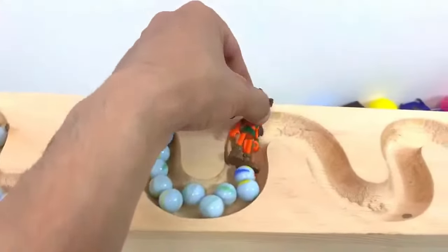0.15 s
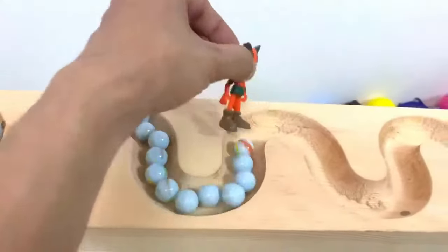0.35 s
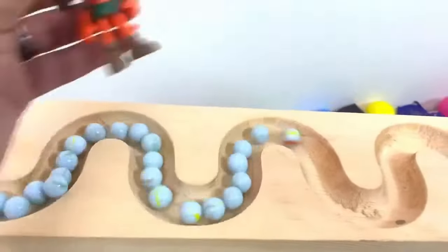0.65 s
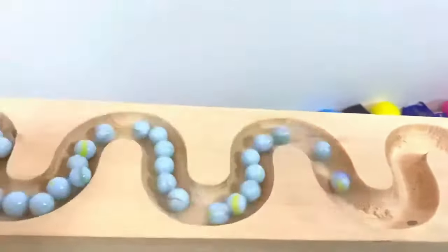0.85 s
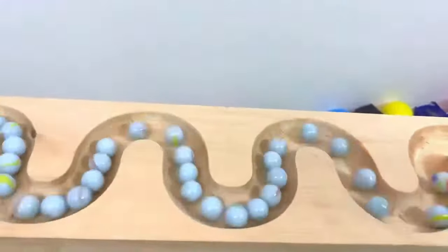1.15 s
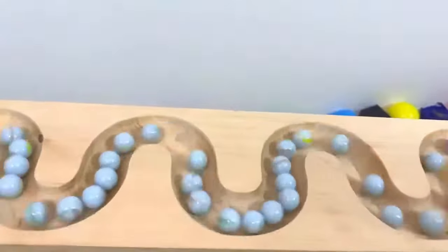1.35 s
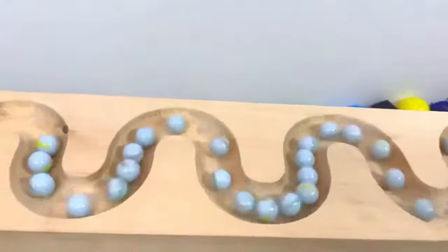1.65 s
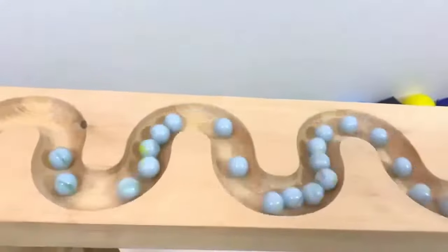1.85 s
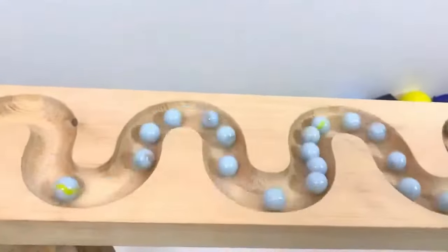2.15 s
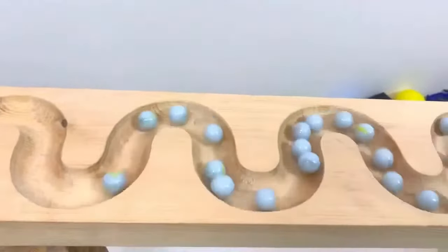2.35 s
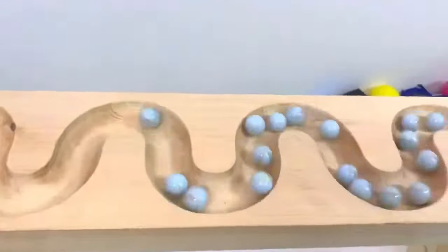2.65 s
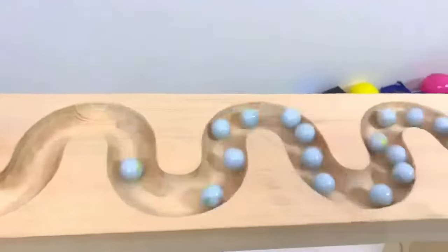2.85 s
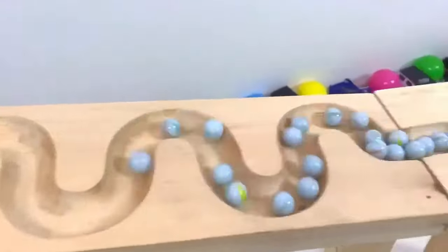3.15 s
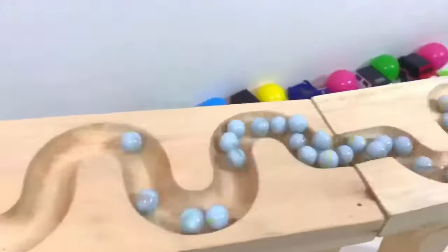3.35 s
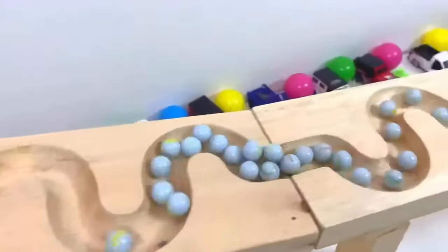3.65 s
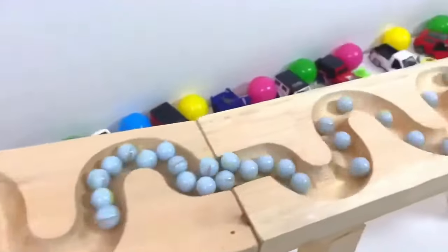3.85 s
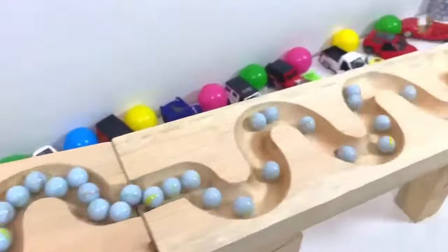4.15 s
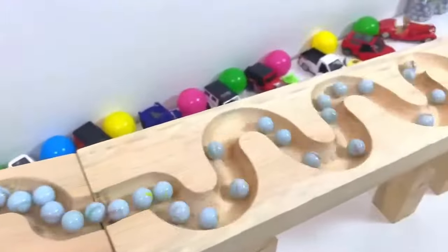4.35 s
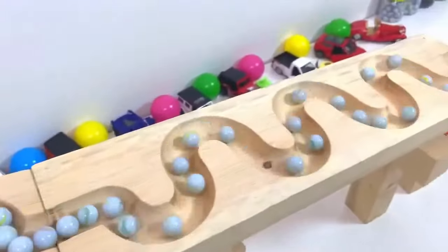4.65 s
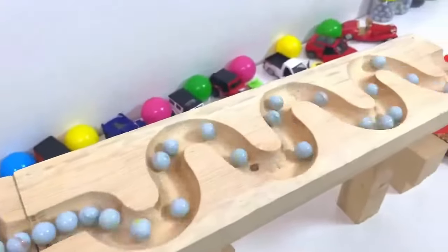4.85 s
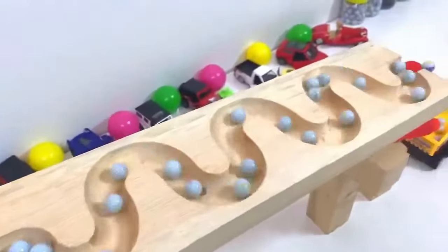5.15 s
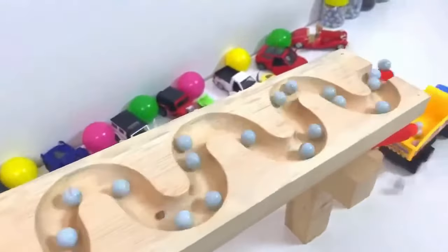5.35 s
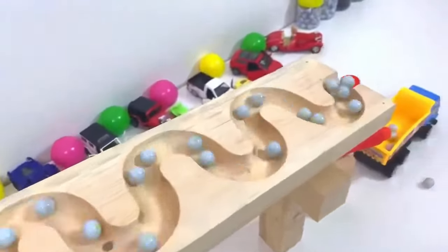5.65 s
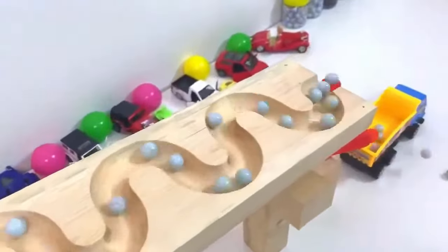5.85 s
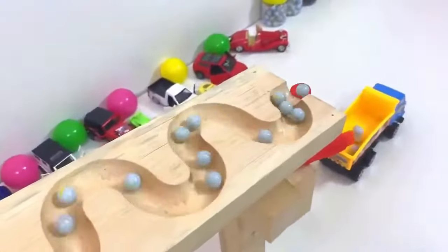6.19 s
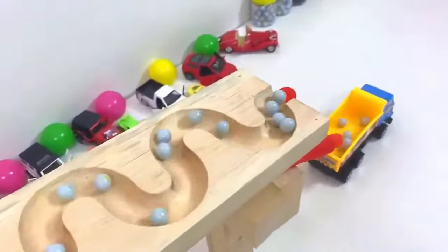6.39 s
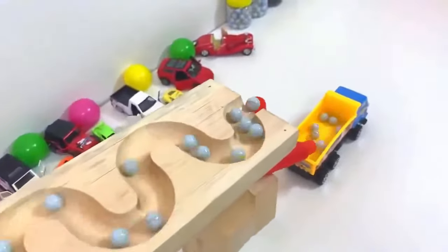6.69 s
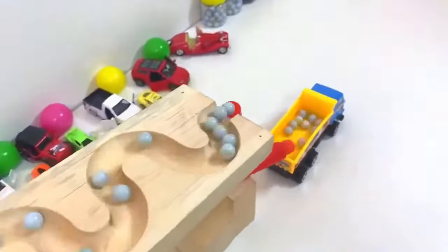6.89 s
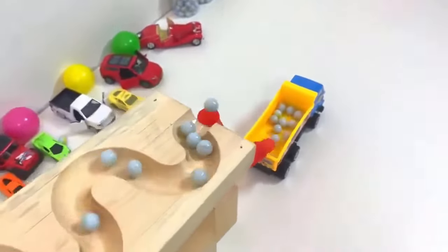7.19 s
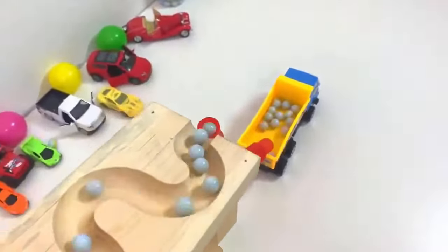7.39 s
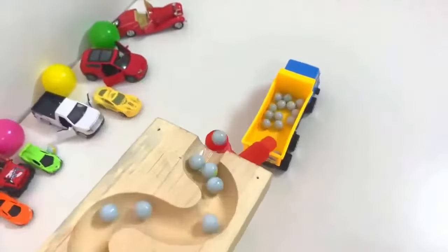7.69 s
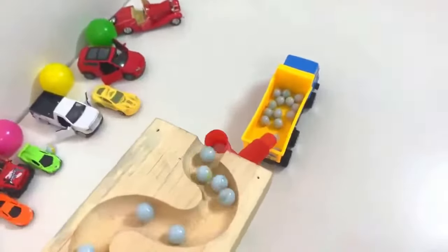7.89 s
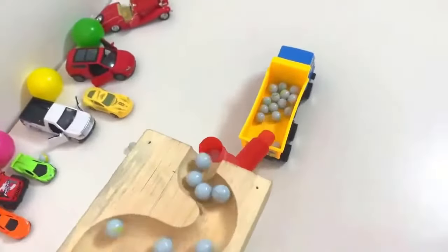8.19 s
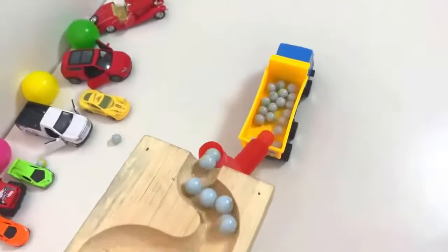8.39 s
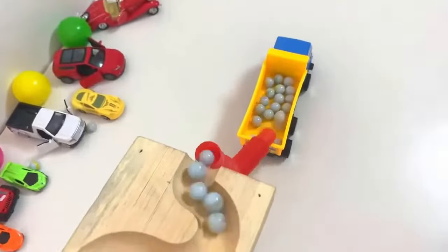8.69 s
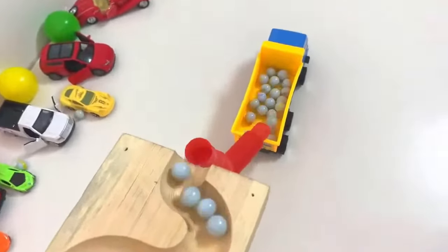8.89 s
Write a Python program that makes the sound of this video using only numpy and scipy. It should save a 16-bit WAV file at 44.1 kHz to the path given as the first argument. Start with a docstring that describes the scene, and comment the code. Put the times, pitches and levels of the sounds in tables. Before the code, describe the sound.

In a small hard room, a train of glass marbles gathers speed down a winding groove in wooden boards: low grainy rumble, short wooden ringing and bright glass clicks. After about five and a half seconds they drop one by one into a plastic toy truck bed, with much louder hollow clacks, small bounces and rattling. Close stereo microphone, seemingly following the track, with short lively reverberation.

```python
"""A rolling rumble with ringing wood and glassy clicks gives way to a plastic clatter, in a small hard room.
Glass marbles are let go down a winding groove in two wooden boards: random impacts excite the board modes.
Marbles click on each other and knock the groove walls: short pulses and dense rings through colour filters.
At the end they drop down a chute into the plastic bed of a toy truck: damped modes, clacks and rattling.
Echoes and diffuse reverberation surround them, over dull low bumps and a steady room tone."""
import sys
import numpy as np
from scipy import signal
from scipy.fft import rfft, irfft
from scipy.io import wavfile
from scipy.ndimage import uniform_filter1d, map_coordinates

SR = 44100
rng = np.random.default_rng(int(sys.argv[2]) if len(sys.argv) > 2 else 0)


def waveform_to_disk(signal):
    """Save audio, clipped to [-1, 1], as 16-bit WAV at the path in sys.argv[1]."""
    frames = np.transpose(np.atleast_2d(signal))
    scaled = np.clip(frames, -1, 1) * 32767
    samples = np.round(scaled).astype(np.int16)
    wavfile.write(sys.argv[1], SR, samples)


N = 398223
TIME = np.arange(N) / SR
JOINT_S = 3.1  # the leading marbles pass on to the lower board
TRACK_LAG_S, TRUCK_LAG_S = .0003, -0.0001786  # nominal delay of the left ear behind the right

# Table levels are relative: each layer adds its own gain. Colours list hz, db_per_hz.
# level of the rolling train, standing for its speed: time_s, level_db
ROLLING_PACE = [(0.9, -69), (1.31, -60), (2.33, -54), (3.67, -56), (4.2, -62), (5.4, -56)]
# marble against the groove wall: start_s, ring_1_db, ring_2_db, ring_3_db, ring_4_db
WALL_KNOCKS = [(1.117, -58, -54, -34.5, -62), (1.769, -42, -50, -44, -53), (1.811, -31.5, -27, -25.5, -47),
               (2.289, -38, -37.5, -54, -72.5), (2.384, -37, -40, -66, -80), (2.522, -38, -44, -31, -71),
               (2.582, -42, -48, -36.5, -68), (2.729, -38, -45, -40, -60), (3.246, -48, -48, -44, -38),
               (3.502, -46, -46, -43.5, -56), (3.779, -45, -39, -52, -68.5), (3.812, -48, -37.5, -50, -57),
               (3.832, -57, -41, -47, -43.5)]
# marble into the truck: start_s, bed_boom_db, wall_clack_db, contact_crack_db, pile_glass_db, boom_pitch_hz
TRUCK_DROPS = [(5.479, -13.5, -15, -16.5, -26, 693), (5.6713, -25.5, -19.5, -21.5, -33, 670),
               (5.7653, -10.5, -17, -15.5, -24.5, 702), (5.891, -39, -27.5, -34, -41, 693),
               (5.9545, -15.5, -21, -21.5, -31.5, 684), (6.012, -30, -24.5, -18.5, -32, 700),
               (6.042, -20, -28, -41, -55, 659), (6.1613, -32, -21.5, -22.5, -40, 697),
               (6.237, -26.5, -27.5, -35, -58, 625), (6.296, -35, -27.5, -39, -34, 610),
               (6.361, -29.5, -50, -57, -46, 630), (6.381, -35, -51, -57, -50, 600),
               (6.457, -24, -26.5, -30, -28, 633), (6.57, -28, -36, -43, -54, 642),
               (6.633, -34, -31, -37, -39, 630), (6.668, -32.5, -28.5, -34, -33.5, 656),
               (6.804, -25, -35.5, -35, -31.5, 617), (6.871, -25, -35, -33, -32, 643),
               (6.902, -28, -29, -33.5, -34, 674), (6.944, -33, -40, -56, -54, 670),
               (7.001, -44, -30, -34.5, -34, 720), (7.042, -26, -26, -31, -29, 726.5),
               (7.09, -35, -37, -57, -36.5, 736), (7.267, -23, -25, -31, -29.5, 684),
               (7.326, -33.5, -27, -33.5, -41, 660), (7.51, -22.5, -24.5, -34, -35, 695),
               (7.552, -36, -27.5, -31, -27, 675), (7.6073, -10, -17.5, -16, -26, 717),
               (7.651, -23.5, -25.5, -31, -34.5, 666), (7.7963, -14.5, -23.5, -23, -37.5, 725),
               (7.8855, -21.5, -32.5, -31.5, -51, 756), (7.931, -30, -34, -42, -38, 715),
               (7.9874, -22, -25, -26.5, -33, 684), (8.1224, -28, -21.5, -28.5, -29.5, 607),
               (8.247, -36, -23.5, -40.5, -38, 710), (8.383, -21.5, -22, -27, -27.5, 720),
               (8.501, -27.5, -25, -29.5, -31.5, 705), (8.531, -24, -19.5, -29.5, -29, 678),
               (8.603, -31.5, -39, -53, -53, 704), (8.653, -36.5, -34.5, -45, -51, 696),
               (8.7356, -19.5, -24, -28, -29.5, 830), (8.803, -33.5, -37, -43, -53, 774),
               (9.004, -26.5, -25.5, -28.5, -27.5, 855)]
# wood scuffed by a marble pressed against the wall of a bend: hz, db_per_hz
GRIT_COLOUR = [(750, 0), (1500, 1.5), (2900, -6), (4000, -21.5)]
# plastic walls of the truck bed: hz, db_per_hz
CLACK_COLOUR = [(600, -33), (900, -5), (1170, 3), (1600, 0.5), (2000, -2), (2500, -13.5), (3600, -46)]
# contact of marble and truck: hz, db_per_hz
CRACK_COLOUR = [(1700, -8.5), (2500, 0.5), (3400, -1), (4400, 1), (5200, -6), (6200, -5.5), (7200, -18.5),
                (10000, -25)]
# glass striking the pile of marbles: hz, db_per_hz
PILE_COLOUR = [(4000, -22.5), (7000, -1.5), (10500, -1), (12000, -6), (13500, -3.5), (15500, -39)]


def rolling():
    """Rough contact as a random force: marbles rumble over the grain, ring the board modes and scuff the wood."""
    # broad rumble: hz, db_per_hz
    rumble_colour = [(60, -26.5), (130, -3), (200, -1.5), (330, -1.5), (700, -1.5), (1400, -8.5),
                     (3000, -24.5), (6000, -29), (15000, -69)]
    # ring at the usual pace, one row for each of the first three rings: upper_board_db, lower_board_db
    steady_ring = [(-55.5, -50), (-79, -63), (-80, -87)]
    # a marble grinds round the outer wall of a bend: middle_s, length_s, ring_1_db, ring_2_db, ring_3_db
    bend_grinds = [(1.17, 0.15, -53, -60, -47.5), (1.46, 0.061, -46.5, -68, -62),
                   (1.55, 0.06, -60, -74, -53), (1.655, 0.058, -46.5, -62, -44.5),
                   (1.73, 0.095, -54, -56, -48.5), (1.839, 0.17, -36, -35.5, -55),
                   (2.087, 0.051, -39, -53, -38.5), (2.144, 0.067, -36, -50, -39),
                   (2.22, 0.1, -45, -57, -56), (2.33, 0.26, -44, -41, -65), (2.48, 0.18, -40, -47, -49),
                   (2.636, 0.061, -39.5, -56, -38), (2.724, 0.085, -36.5, -54, -44),
                   (2.833, 0.12, -45, -60, -41.5), (3.008, 0.095, -40.5, -48, -56),
                   (3.26, 0.15, -47, -52, -53), (3.37, 0.076, -38.5, -53, -67),
                   (3.929, 0.037, -41.5, -67, -69), (4.106, 0.066, -40.5, -44, -73),
                   (4.18, 0.0685, -39, -49, -62), (4.276, 0.048, -42, -58.5, -73.5),
                   (4.369, 0.091, -41, -53, -82), (4.56, 0.081, -41.5, -51.5, -83),
                   (4.791, 0.19, -46.5, -53, -71), (4.99, 0.089, -46, -52, -78),
                   (5.068, 0.052, -36, -58, -56.5), (5.123, 0.047, -34.5, -68, -67),
                   (5.36, 0.033, -41.5, -59.5, -68)]
    # the second ring sinks as the marbles run on down the lower board: time_s, pitch_factor
    ring_glide = [(3.85, 0.9), (4.12, 0.91), (4.36, .84)]
    # ever new points of contact shift the pitch, rms share of frequency: ring_1, ring_2, ring_3
    ring_wander = (0.0048, 0.01017, 0.0032)
    # damping by the rolling marbles, factor on the mode width: ring_1, ring_2, ring_3
    ring_damping = (1, 1, 0.86)
    rumble_db, ring_gains_db, grit_db = 3.5, (-1.5, -2.5, -1), -6.0
    release_s = 0.5
    ring_growth, usual_pace_db = 2.1, -56  # dB of ring per dB of rumble, around this pace
    skid_db, skid_fall_db_per_s = -10, 221  # after a knock the marble skids on along the wall

    grain = amp(2.0 * unit(uniform_filter1d(rng.standard_normal(N), size=900)))
    pace = amp(np.interp(TIME, *np.transpose(ROLLING_PACE)))
    out = amp(rumble_db) * pace * grain * noise(rumble_colour, 0.61)

    drive = (pace / amp(usual_pace_db)) ** ring_growth
    on_lower = np.clip((TIME - JOINT_S) / 0.25 + .5, 0, 1)
    flutter = lumps(depth_db=4.5, length_s=0.0099)  # the marble chatters against the wall
    pressure = 0
    for k, (ring_db, (upper_db, lower_db)) in enumerate(zip(ring_gains_db, steady_ring)):
        steady = drive * amp(upper_db + (lower_db - upper_db) * on_lower)
        grinding = swells([(s, length, rings_db[k]) for s, length, *rings_db in bend_grinds])
        skids = [(s, rings_db[k] + skid_db) for s, *rings_db in WALL_KNOCKS]
        skidding = dying(skids, skid_fall_db_per_s)
        gain = amp(ring_db) * np.sqrt(steady ** 2 + grinding ** 2 + skidding ** 2)
        if k > 0:  # the scuffing follows the higher rings, woken by marbles pressed hard to the wall
            pressure = np.hypot(pressure, gain)
        bumps = impacts(per_s=500, spread_db=3.2)
        upper, lower = (
            unit(convolve(bumps, board_ring(k, side, ring_damping[k], rise_s=0.0033)))
            for side in (False, True))
        ring = sustained(np.sqrt(1 - on_lower) * upper + np.sqrt(on_lower) * lower)
        glide = np.interp(TIME, *np.transpose(ring_glide)) if k == 1 else 1
        out += gain * flutter * wandering(ring, ring_wander[k], glide)

    def scuff():
        return snap(causal(GRIT_COLOUR, uneven_db=5.5), 3.1, 0.025, TRACK_LAG_S)

    out += amp(grit_db) * pressure * patter(scuff, per_s=240, spread_db=6.0)
    return out * np.clip((TIME - release_s) / .5, 0, 1)  # the train gathers speed


def bending():
    """Flexural resonance: the weight of the rolling train excites the lowest bending mode of each board."""
    # slow bending mode: upper_board_hz, lower_board_hz, width_hz
    upper_hz, lower_hz, width_hz = (267, 337, 18)
    bend_db = -8.0
    t = np.arange(4096) / SR
    bumps = ears([impacts(per_s=400, spread_db=3.4) for _ in range(2)], 0.33, 0)
    decay = np.exp(-np.pi * width_hz * t)
    upper, lower = (
        unit(convolve(bumps, decay * np.sin(2 * np.pi * hz * t))) for hz in (upper_hz, lower_hz))
    on_lower = np.clip(TIME - JOINT_S, 0, 1)
    return amp(bend_db) * level(ROLLING_PACE) * (np.sqrt(1 - on_lower) * upper + np.sqrt(on_lower) * lower)


def knocks():
    """Impulsive excitation: a marble meets a bend, rings the board damped by the touch and scuffs the wood."""
    damping, scuff_db = 2.5, -9  # factor on mode width; level against the third ring
    out = np.zeros((2, N))
    for s, *rings_db in WALL_KNOCKS:
        rings = sum(amp(db) * board_ring(k, s > JOINT_S, damping, rise_s=0.0022)
                    for k, db in enumerate(rings_db))
        add(out, s, rings)
        scuff = snap(causal(GRIT_COLOUR, uneven_db=9), 11, 0.051, TRACK_LAG_S, rise_s=.003)
        add(out, s, amp(scuff_db + rings_db[2]) * scuff)
    return out


def clicks():
    """Elastic collision: brief glass contacts, scattered by the groove and passed on through the queue."""
    # marble against marble; hardness spreads the sound below and above the glass band:
    # start_s, level_db, hardness_db
    collisions = [(0.55, -54, -13.5), (0.663, -53, -15), (0.756, -43, -26), (0.864, -52, -18),
                  (0.878, -55.5, -5), (0.9335, -52, -15), (0.949, -47.5, -15), (1.126, -35.5, -16),
                  (1.246, -37.5, -24.5), (1.316, -43, -18), (1.376, -44, -7), (1.546, -37.5, -7),
                  (1.582, -35, -21.5), (1.75, -46, -16), (1.764, -37.5, -4.5), (1.8595, -37, -5.5),
                  (1.8992, -39.5, -21), (2.036, -36, -21), (2.054, -42, -14), (2.122, -41, -17.5),
                  (2.2293, -41.5, -10.5), (2.2589, -36.5, -5.5), (2.326, -43.5, -3.5), (2.4259, -33, -9),
                  (2.442, -40.5, -5), (2.462, -40, -9), (2.5192, -35, -8), (2.5793, -37, -8),
                  (2.598, -41, -9), (2.612, -40.5, -9.5), (2.7033, -37.5, -11), (2.7237, -37.5, -11),
                  (2.764, -42.5, -4), (2.9254, -49, -10), (3.012, -45, -10), (3.096, -40.5, -12),
                  (3.123, -42, -6), (3.1528, -41, -3), (3.239, -40.5, -2), (3.2586, -34, -5.5),
                  (3.3637, -36.5, -12), (3.389, -39, -8), (3.4335, -38, -4), (3.4633, -39.5, -2),
                  (3.509, -38, -5.5), (3.5232, -37.5, -4), (3.54, -35, -4.5), (3.58, -41, -4),
                  (3.591, -45, 1), (3.6604, -30.5, -7.5), (3.6985, -33.5, -6), (3.7154, -32, -8),
                  (3.931, -38, -7), (4.0995, -48, -12), (4.304, -55, -10), (4.702, -37, -8.5),
                  (4.8448, -38.5, -5.5), (4.88, -46, -23), (5.0268, -39.5, -18), (5.1151, -42.5, -15),
                  (5.216, -38.5, -15), (5.3464, -46, -19.5), (6.2087, -32, -23), (6.266, -31, -19.5),
                  (6.7853, -41.5, 1.5), (7.3657, -31, -10), (8.613, -48, -2), (8.8792, -45, -7),
                  (8.956, -40.5, -3)]
    # main glass band: hz, db_per_hz
    glass_colour = [(3000, -45), (6000, -21.5), (7600, -10.5), (8250, 2.5), (8900, -5.5), (10000, -0.5),
                    (11000, -6), (13500, -45)]
    # spread below the band: hz, db_per_hz
    low_colour = [(1500, -9), (3500, -18.5), (4600, -9.5), (6200, 2.5), (7300, -2.5), (9000, -39)]
    # spread above the band: hz, db_per_hz
    top_colour = [(9500, -18), (12000, 1), (13500, -3), (15000, -23)]
    # small touches in the queue: hz, db_per_hz
    queue_colour = [(2000, -19), (5000, -18.5), (6200, -13), (7600, -4), (8300, 2), (9200, 0), (10500, -6),
                    (13500, -16.5), (15500, -40)]
    # marbles bunch up and crowd each other: middle_s, length_s, level_db
    bunchings = [(1.9, 0.37, -44.5), (2.58, 0.47, -49.5), (3.05, 0.44, -46), (3.5, 0.43, -43)]
    low_db, top_db, touch_db = 1.0, -3.5, -3.0
    jostle_db, jostle_fall_db_per_s = -18, 125  # stir against the click, and its fall
    ticking_db = -5  # steady touches, against the pace level

    out = np.zeros((2, N))
    for s, db, hardness_db in collisions:
        body, low, top = (
            causal(colour, uneven_db=2.0) for colour in (glass_colour, low_colour, top_colour))
        parts = (body, 0), (low, hardness_db + low_db), (top, hardness_db + top_db)
        click = sum(amp(db + part_db) * snap(colour, 1.23, 0.013, TRACK_LAG_S) for colour, part_db in parts)
        add(out, s, click)

    def touch():
        return snap(causal(queue_colour, uneven_db=6.0), 3.1, 0.018, TRACK_LAG_S)

    touches = patter(touch, per_s=100, spread_db=4.5)
    jostling = dying([(s, db + jostle_db) for s, db, _ in collisions], jostle_fall_db_per_s)
    ticking = amp(ticking_db) * level(ROLLING_PACE) * lumps(depth_db=7.5, length_s=0.036)
    gain = np.sqrt(jostling ** 2 + swells(bunchings) ** 2 + ticking ** 2)
    return out + amp(touch_db) * gain * touches


def click_echoes(glass):
    """Specular reflection: the far wall of the groove and the walls of the room return each click."""
    # reflections: delay_s, level_db
    taps = [(.0021, -4.5), (.017, -18.5), (0.0346, -13.5)]
    return echoes(glass, taps)


def truck():
    """Impact on a shell: each falling marble booms the bed, clacks its walls, strikes the pile and hops on."""
    boom_db, clack_db, crack_db, glass_db = 0.14, -1, -1.5, -1.5
    glance_db, rebound_db, hop_loss_db = -8, -9, 8.3
    out = np.zeros((2, N))
    for s, boom, walls, contact, glass, boom_hz in TRUCK_DROPS:
        clack, crack, pile = (
            causal(colour, uneven_db=4) for colour in (CLACK_COLOUR, CRACK_COLOUR, PILE_COLOUR))
        add(out, s, amp(boom + boom_db) * bed_boom(boom_hz))
        add(out, s, amp(walls + clack_db) * snap(clack, 1.85, 0.032, TRUCK_LAG_S))
        add(out, s, amp(contact + crack_db) * snap(crack, 1.7, 0.024, TRUCK_LAG_S, rise_s=0.0014))
        add(out, s, amp(glass + glass_db) * snap(pile, 2.7, 0.05, TRUCK_LAG_S, rise_s=0.00038))
        # it glances off its neighbours around the landing, then hops on, each time more weakly
        glances = [(delay, glance_db) for delay in rng.uniform(-.003, .007, size=2)]
        hop_delays = np.cumsum(rng.uniform(.012, 0.029, size=3))
        hops = [(delay, rebound_db - hop_loss_db * hop) for hop, delay in enumerate(hop_delays)]
        for delay, db in glances + hops:
            clack, crack = (causal(colour, uneven_db=5) for colour in (CLACK_COLOUR, CRACK_COLOUR))
            tap = amp(walls) * snap(clack, 2.2, 0.032, TRUCK_LAG_S)
            tap = tap + amp(contact) * snap(crack, 1.3, 0.011, TRUCK_LAG_S)
            add(out, s + delay, amp(db) * tap)
    return out


def bed_boom(boom_hz=650, lowest_hz=590, size=4096):
    """Modal decay: the plastic bed swings for a few cycles, its pitch set by where the marble lands."""
    # modes of the bed at its usual pitch: hz, level_db, t60_s
    bed_modes = [(601, -9.5, 0.054), (678, 0.5, 0.042), (762, 0.5, 0.03), (837, -10.5, 0.018)]
    t = np.arange(size) / SR
    shift = boom_hz / 695  # against the usual pitch, Hz
    modes = 0
    for hz, db, t60 in bed_modes:
        gain = amp(db + rng.normal(0, 1.4) - 60 * t / t60)
        modes = modes + gain * np.sin(2 * np.pi * hz * shift * rng.normal(1, 0.031) * t)
    # so small a tray radiates almost nothing below its first mode
    modes = signal.sosfilt(signal.butter(7, lowest_hz, "high", fs=SR, output="sos"), modes)
    return blow(ears([modes, modes], 0.99, TRUCK_LAG_S))


def rattle():
    """Repeated random impacts: bounces on the pile after each drop, and marbles in the chute, ring the plastic."""
    # marbles run through the plastic chute: middle_s, length_s, level_db
    chute_runs = [(6.05, 0.48, -49), (6.36, 0.28, -46), (6.62, 0.58, -34.5), (6.95, 0.36, -37.5),
                  (7.42, 0.38, -42), (8.08, 0.28, -37.5)]
    rattle_db, fall_db_per_s = -9, 143  # stir of the pile, and its fall
    growth, usual_drop_db = 0.61, -24  # dB of rattle per dB of drop, around this drop

    def wall_tap():
        return snap(causal(CLACK_COLOUR, uneven_db=8), 2.5, 0.035, TRUCK_LAG_S)

    def contact_tap():
        return snap(causal(CRACK_COLOUR, uneven_db=4.0), 3.0, 0.0053, TRUCK_LAG_S)

    def glass_tap():
        return snap(causal(PILE_COLOUR, uneven_db=7), 1.4, 0.048, TRUCK_LAG_S)

    boom = patter(bed_boom, per_s=45, spread_db=3.0)
    walls = patter(wall_tap, per_s=53, spread_db=3.5)
    contact = patter(contact_tap, per_s=50, spread_db=1.5)
    glass = patter(glass_tap, per_s=96, spread_db=-3.0)
    chute = swells(chute_runs)
    # bounces, layer level dB, share of the chute dB
    layers = (boom, -3.0, 0), (walls, -4, 0), (contact, -6, -8), (glass, -2, -8)
    out = np.zeros((2, N))
    for k, (bounces, db, chute_db) in enumerate(layers):
        stirs = [(s, usual_drop_db + growth * (parts_db[k] - usual_drop_db))
                 for s, *parts_db in TRUCK_DROPS]
        settling = amp(rattle_db) * dying(stirs, fall_db_per_s)
        out += amp(db) * np.hypot(settling, amp(chute_db) * chute) * bounces
    return out


def table_thuds():
    """Structure-borne sound: the boom of each drop passes through the wheels into the table."""
    # table under the truck: hz, db_per_hz
    thud_colour = [(90, -7.5), (190, -7.5), (390, -2.5), (640, -13)]
    thud_db = -24  # against the boom
    out, thud = np.zeros((2, N)), causal(thud_colour)
    for s, boom, *_ in TRUCK_DROPS:
        add(out, s, amp(boom + thud_db) * snap(thud, 6.4, 0.064, TRUCK_LAG_S, size=3072))
    return out


def wall_echo(x, dull_hz=950):
    """Low-passed reflection: the walls beside the truck throw the boom back."""
    # walls near the truck: delay_s, level_db
    near_walls = [(.0135, -9.5), (.0165, -5), (.0225, -14.5), (.04, -10.5)]
    return echoes(signal.sosfilt(signal.butter(4, dull_hz, fs=SR, output="sos"), x), near_walls)


def room(x, turn_s=1.3, count=4):
    """Changing paths: as for a listener moving along the track, the sound crossfades between diffuse tails."""
    shares = np.array([
        np.maximum(np.cos(2 * np.pi * (TIME / turn_s + k / count)), 0) for k in range(count)])
    shares /= np.linalg.norm(shares, axis=0)
    return sum(convolve(x * share, room_tail()) for share in shares)


def room_tail(size=26460):
    """Diffuse reverberation: noise in which each band of a small hard room dies at its own speed."""
    # left-right likeness of the reverberation: hz, likeness
    likeness = [(250, 0.16), (650, 0.78), (1300, 0.11), (2500, 0.062)]
    # reverberation time: hz, t60_s
    decay_times = [(200, 0.05), (700, 0.515), (2000, 0.36), (5000, 0.39), (9000, 0.4), (14000, 0.28)]
    # level of the reverberation: hz, level_db
    wet_levels = [(200, -12), (520, -3.5), (720, -4), (1300, -2), (2500, 0), (5000, 2), (9000, 0),
                  (13500, -5), (15000, -22)]
    hz, t, z = signal.stft(rng.standard_normal((2, size)), SR, nperseg=256)
    same = np.clip(read(likeness, hz), 0, 1)[:, None]
    z = np.array([z[0], same * z[0] + np.sqrt(1 - same ** 2) * z[1]])
    t60 = read(decay_times, hz)[:, None]
    decay = amp(read(wet_levels, hz)[:, None] - 60 * t / t60)
    z = z * decay * np.sqrt(2 * np.log(1000) / (t60 * SR))  # the energy is independent of t60
    tail = signal.istft(z, SR, nperseg=256)[1]
    tail *= np.clip(np.arange(tail.shape[1]) / SR / 0.0025, 0, 1)
    return np.pad(tail, ((0, 0), (round(.003 * SR), 0)))


def low_bumps():
    """Band-shaped noise under smooth envelopes: dull low bumps while the truck fills."""
    # swells: middle_s, length_s, level_db
    bumps = [(6.3, 1.9, -52), (8.1, 1.68, -51), (8.235, 0.058, -41), (8.32, 0.048, -59)]
    # hz, db_per_hz
    bump_colour = [(20, -10), (48, 8), (95, 9), (300, -19)]
    return swells(bumps) * noise(bump_colour, 0.97)


def room_tone(tone_db=-59):
    """Stationary noise: the low steady tone of the room."""
    # hz, db_per_hz
    tone_colour = [(25, -11.5), (92, -4), (151, -21), (229, -17), (266, -8.5), (286, -20.5), (748, -27),
                   (1250, -41.5), (2320, -38), (3280, -51.5), (9000, -54), (11700, -93)]
    return amp(tone_db) * noise(tone_colour, 0.9)


def board_ring(number, lower, damping, rise_s, size=4096):
    """Modal superposition: one group of damped board modes, purer the more slowly it builds up."""
    # ring_number (from 0), upper_board_hz, lower_board_hz, width_hz, level_db
    board_modes = [(0, 814, 1000, 56, -4), (0, 1106, 1025, 34.5, 1), (0, 1193, 1050, 51, -1.5),
                   (1, 1799, 1740, 42, -5.5), (1, 1915, 1976, 40, 4.5), (2, 2458, 2337, 26.3, 1),
                   (2, 2750, 2630, 99.7, -11), (3, 4480, 4460, 198, 2), (3, 3300, 3580, 251, 2.5)]
    t = np.arange(size) / SR
    ring = 0
    for group, upper_hz, lower_hz, width_hz, db in board_modes:
        if group == number:
            phase = rng.uniform(0, 2 * np.pi) + rng.normal(0, 0.77, (2, 1))
            hz = lower_hz if lower else upper_hz
            decay = np.exp(-np.pi * width_hz * damping * t)
            ring = ring + amp(db) * decay * np.sin(2 * np.pi * hz * t + phase)
    return blow(ring * (1 - np.exp(-t / rise_s)) ** 2)


def snap(colour, scatter, t60, lag_s, rise_s=0.00039, size=1536):
    """Contact transient: a sharp pulse, then a dense ring that swells and dies within milliseconds."""
    t = np.arange(size) / SR
    lag_s = lag_s * rng.uniform(.3, 1.5)  # each contact lies in a slightly different direction
    envelope = amp(-60 * t / t60) * (1 - np.exp(-t / rise_s))
    ring = ears(rng.standard_normal((2, size)), .7, lag_s) * envelope
    pulse = ears([t == 0, 0 * t], 1, lag_s)
    return blow(convolve(blow(pulse) + scatter * blow(ring), colour))


def impacts(per_s, spread_db):
    """Poisson-like excitation: a sparse train of random blows of unequal strength and either sign."""
    size = amp(spread_db * np.minimum(rng.exponential(1, N), 3))
    return size * rng.choice([-1, 1], N) * (rng.random(N) < per_s / SR)


def patter(make, per_s, spread_db, count=8):
    """Superposed random impacts: blows on several spots that each sound a little different."""
    spots = 0
    for _ in range(count):
        blows = impacts(per_s / count, spread_db)[None]
        spots = spots + signal.oaconvolve(blows, make(), axes=1)[:, :N]
    return unit(spots)


def sustained(x, size=700):
    """Steady energy supply: unbroken rolling contact evens out the level of a ring."""
    return x / np.sqrt(uniform_filter1d((x ** 2).mean(0), size) + .02)


def wandering(x, share, glide, wander_s=0.0508):
    """Frequency modulation by time warping: pitch follows a glide and drifts by a random share of itself."""
    drift = unit(uniform_filter1d(rng.standard_normal(N), max(round(wander_s * SR), 1)))
    place = np.cumsum(glide + share * (drift - drift.mean())) % (N - 1)
    return np.array([map_coordinates(channel, [place], order=3) for channel in x])


def lumps(depth_db, length_s):
    """Random amplitude modulation: a gain that surges and drops, with an rms of one."""
    drift = unit(uniform_filter1d(rng.standard_normal(N), max(round(length_s * SR), 1)))
    return unit(amp(depth_db * uniform_filter1d(drift, size=200)))


def dying(events, fall_db_per_s, rise_s=0.0099):
    """Exponential decay: gain of the stir after each (start_s, level_db) event, summed in power."""
    power = np.zeros(N)
    for s, db in events:
        start = round(s * SR)
        t = TIME[:N - start][:SR]
        power[start:][:SR] += (amp(db - fall_db_per_s * t) * np.minimum(t / rise_s, 1)) ** 2
    return np.sqrt(power)


def swells(events):
    """Smooth envelopes: gain of cosine swells (middle_s, length_s, level_db), summed in power."""
    power = np.zeros(N)
    for s, length, db in events:
        during = abs(TIME - s) < length / 2
        power[during] += (amp(db) * np.cos(np.pi * (TIME[during] - s) / length)) ** 2
    return np.sqrt(power)


def level(rows):
    """Gain interpolated in decibels from (time_s, level_db) rows, fading in just before the first."""
    s, db = np.transpose(rows)
    return amp(np.interp(TIME, s, db)) * np.clip((TIME - s[0]) / 0.021 + 1, 0, 1)


def echoes(x, taps):
    """Discrete reflections: delayed copies, each (delay_s, level_db)."""
    return sum(amp(db) * np.pad(x, ((0, 0), (round(delay_s * SR), 0)))[:, :N] for delay_s, db in taps)


def noise(points, likeness):
    """Spectral shaping: steady two-channel noise of a given colour."""
    white = ears(rng.standard_normal((2, N)), likeness, 0)
    return unit(irfft(rfft(white) * amp(read(points, np.fft.rfftfreq(N, 1 / SR))), N))


def causal(points, uneven_db=0, size=2048):
    """Minimum-phase response: a colour with random peaks and dips, falling steeply beyond the table's ends."""
    hz = np.arange(size // 2 + 1) * SR / size + 1
    octaves_below = np.maximum(np.log2(points[0][0] / hz), 0)
    octaves_above = np.maximum(np.log2(hz / points[-1][0]), 0)
    peaks = uneven_db * unit(uniform_filter1d(rng.standard_normal(len(hz)), size=16))
    gain_db = read(points, hz) + peaks - 18 * (octaves_below + octaves_above)
    log_gain = np.log(amp(np.maximum(gain_db, -80)))
    circle = np.concatenate([log_gain, log_gain[-2:0:-1]])
    # the Hilbert transform of the log gain gives the minimum phase
    return np.fft.ifft(np.exp(np.conj(signal.hilbert(circle)))).real[:size // 2]


def ears(pair, likeness, lag_s):
    """Interaural coherence and delay: makes two signals partly alike and delays one ear."""
    c = np.clip(likeness, 0, 1)
    pair = [pair[0], c * pair[0] + np.sqrt(1 - c * c) * pair[1]]
    delays = round(max(lag_s, 0) * SR), round(max(-lag_s, 0) * SR)
    return np.array([np.pad(x, (d, 0))[:len(x)] for x, d in zip(pair, delays)])


def convolve(x, response):
    """Linear filtering along time, keeping the length of x."""
    return signal.fftconvolve(np.atleast_2d(x), np.atleast_2d(response), axes=1)[:, :x.shape[-1]]


def add(mix, s, sound):
    """Superposition: mixes a sound in at time s."""
    part = mix[:, max(round(s * SR), 0):][:, :sound.shape[1]]
    part += sound[:, :part.shape[1]]


def read(points, hz):
    """Interpolates a table along logarithmic frequency."""
    f, value = np.transpose(points)
    return np.interp(np.log(hz + 1), np.log(f + 1), value)


def amp(db):
    """Decibels to amplitude ratio."""
    return 10 ** (np.asarray(db) / 20)


def unit(x):
    """Normalises power: scales to an rms of one."""
    return x / np.sqrt(np.mean(x ** 2) + 1e-20)


def blow(x):
    """Normalises energy: scales a two-channel blow to that of 10 ms at an rms of one."""
    return x * np.sqrt(2 * SR * .01 / np.sum(x ** 2))


def scene(track_wet_db=-4.0):
    """Superposes direct and reflected sound of track and truck, low bumps and room tone."""
    bed = truck() + rattle() + table_thuds()
    glass = clicks()
    track = rolling() + bending() + knocks() + glass + click_echoes(glass)
    # the track is nearer than the truck, so less of the room is heard with it
    space = wall_echo(bed) + room(bed + amp(track_wet_db) * track)
    return track + bed + space + low_bumps() + room_tone()


def record(dry, edge_hz=16100):
    """Soft saturation rounds off the loudest peaks; then a low-pass limits the band."""
    rounded = dry / (1 + dry ** 4) ** .25
    band_limit = signal.firwin(255, edge_hz, window=("kaiser", 9), fs=SR)
    return signal.oaconvolve(rounded, band_limit[None], "same")


dry = scene()
out = record(dry)
waveform_to_disk(out)
```